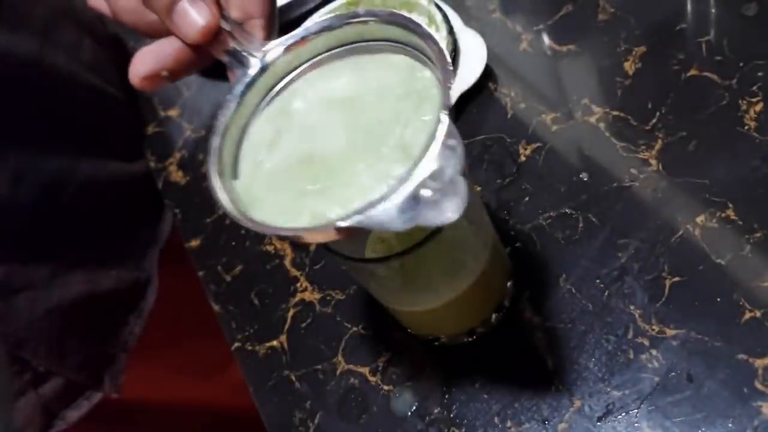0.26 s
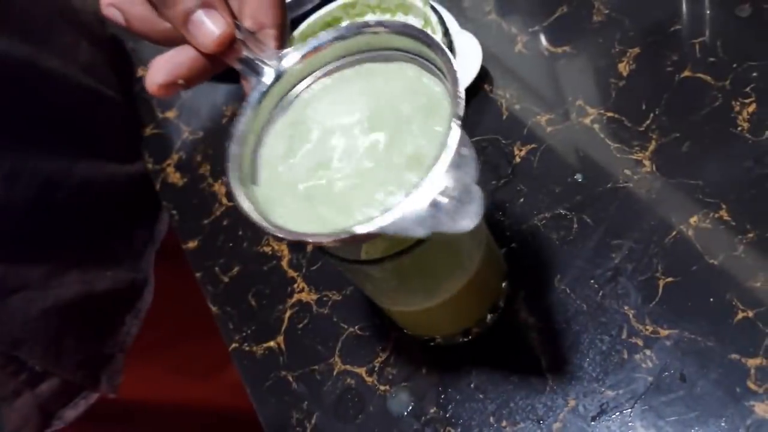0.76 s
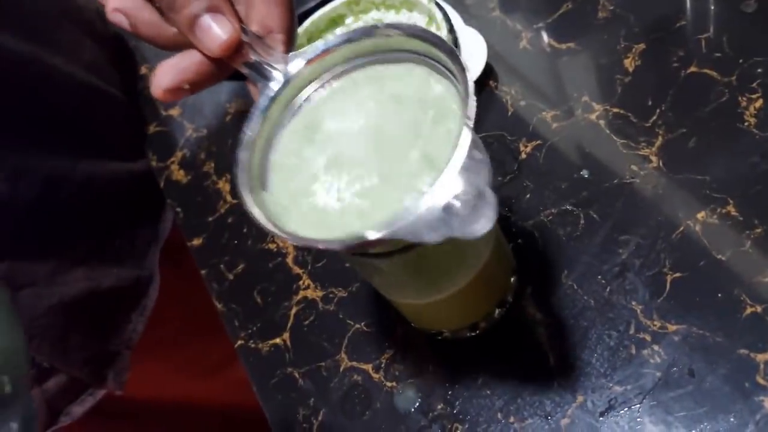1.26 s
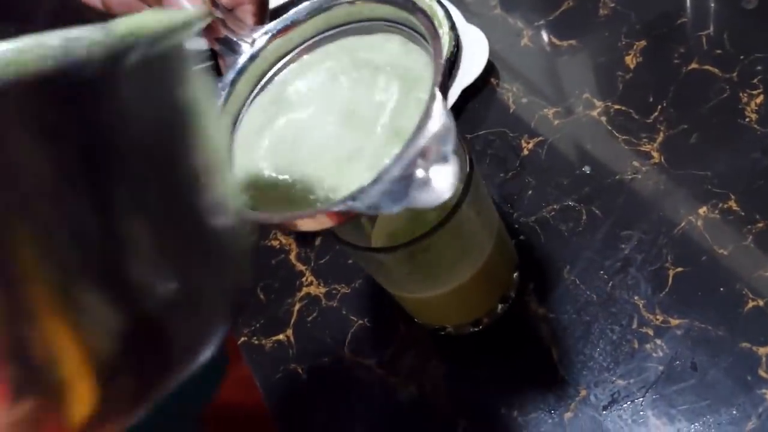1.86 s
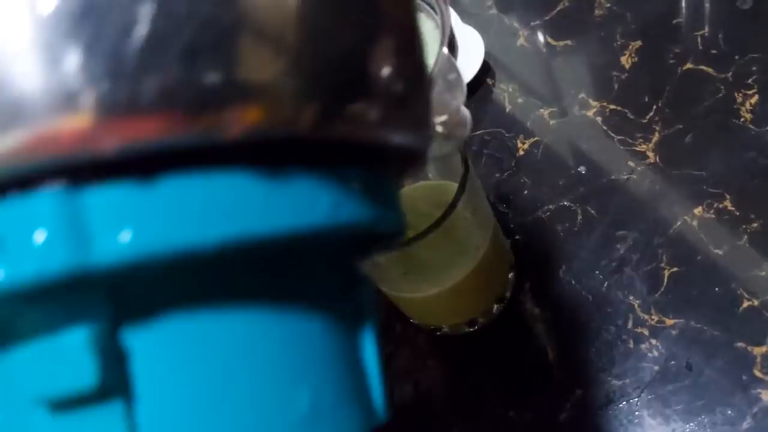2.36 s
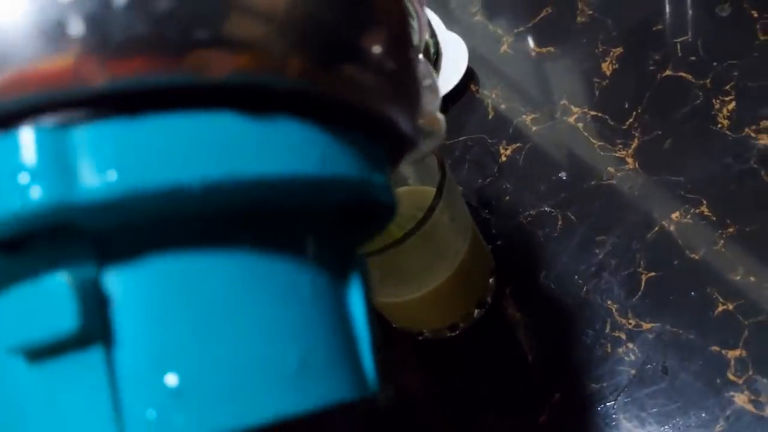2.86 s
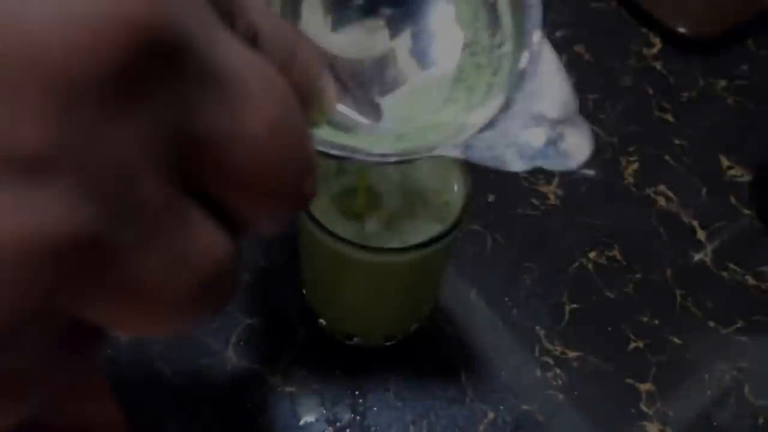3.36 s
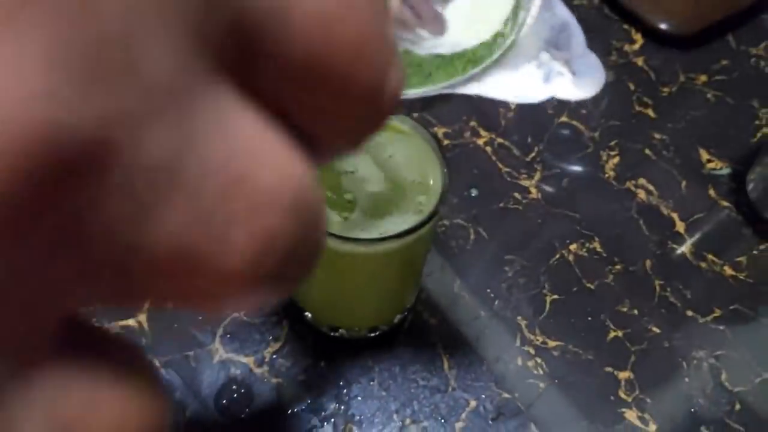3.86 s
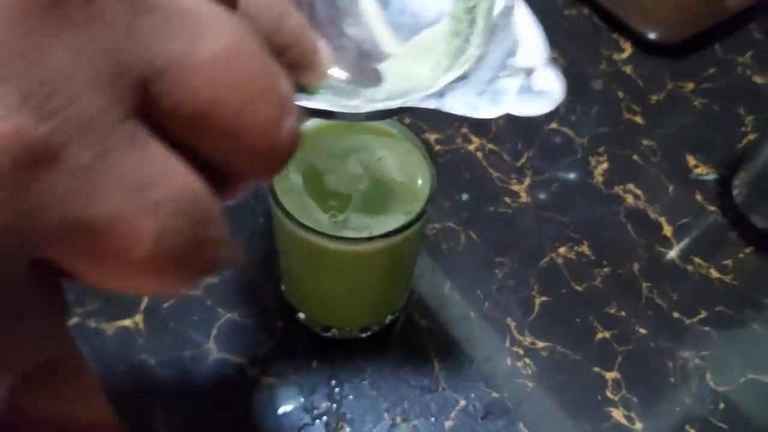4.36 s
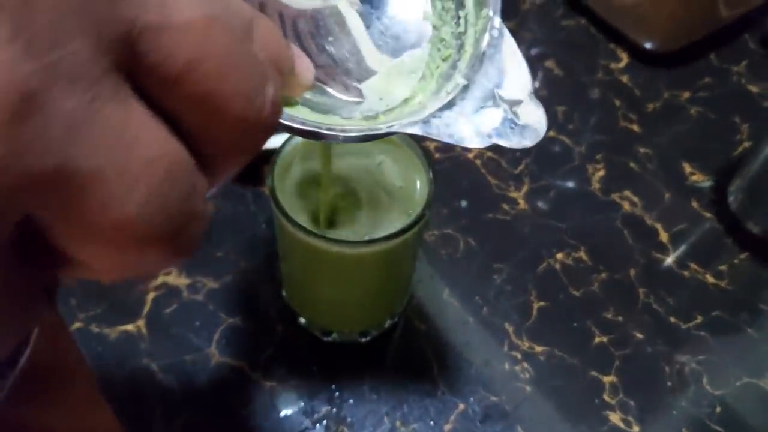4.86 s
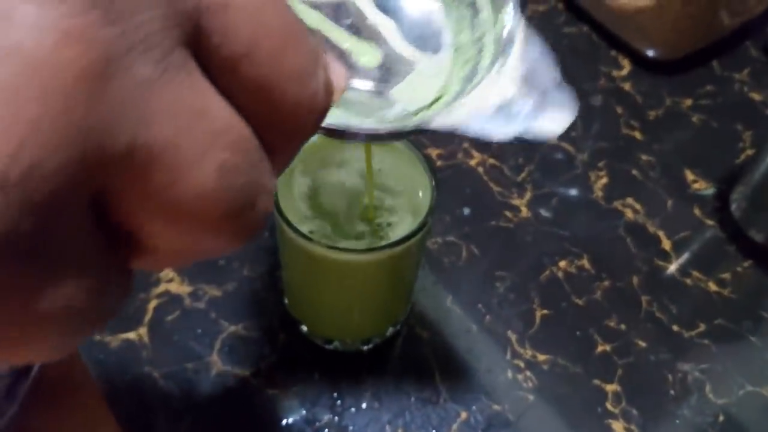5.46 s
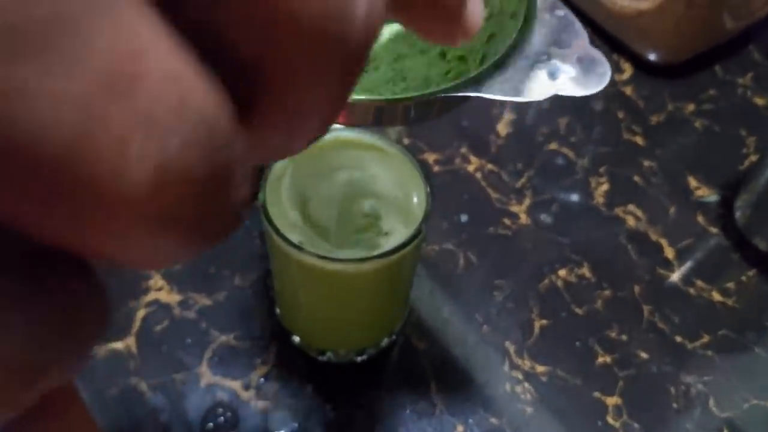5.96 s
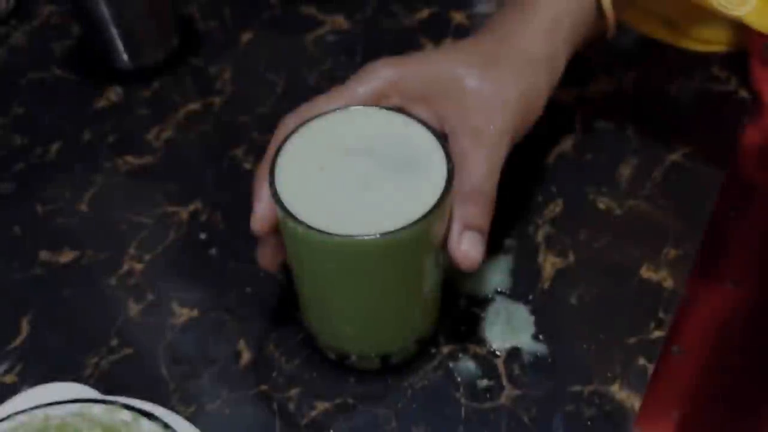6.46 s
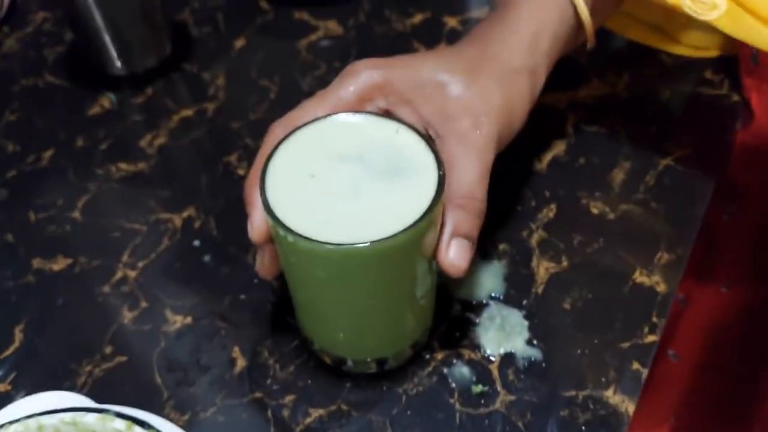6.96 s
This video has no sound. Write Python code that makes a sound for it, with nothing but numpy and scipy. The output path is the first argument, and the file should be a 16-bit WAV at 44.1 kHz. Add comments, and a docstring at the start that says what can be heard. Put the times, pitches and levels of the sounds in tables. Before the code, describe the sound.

Close in a small kitchen with a low fan hum, a metal strainer ticks and scuffs in the hand, then knocks twice, hard and clanky, on a vessel rim. A few light ticks follow. The sound fades out and returns; wet pulp squelches with one sharp pop, then thick juice plops quickly into a full glass. Another fade leaves only faint fan noise.

```python
"""On a stone kitchen counter thick juice is strained over a glass while a fan hums.
Struck steel rings as decaying modes under clattering noise: two knocks on a vessel's rim, light ticks, scuffs.
Wet pulp squelches as swelling noise and popping air; a thin stream plops into the full glass as bubbles ring.
The fan sums shaft harmonics and filtered noise; a drone, hiss, whine and whistles are wavering tones and noise.
The sound fades out and in again twice between the stages of the work."""
import sys
import numpy as np
from scipy import signal
from scipy.fft import rfft, irfft, next_fast_len
from scipy.io import wavfile
from scipy.ndimage import map_coordinates

SR = 44100
rng = np.random.default_rng(int(sys.argv[2]) if len(sys.argv) > 2 else 0)


def put_to_file(sound):
    """Save the sound as 16-bit audio at rate SR, in the file named by the first command-line argument."""
    columns = np.atleast_2d(sound).T  # one column per channel
    safe = np.clip(columns, -1, 1)
    whole_steps = np.round(safe * 32767)
    wavfile.write(sys.argv[1], SR, whole_steps.astype(np.int16))


N = 317946
TIME = np.arange(N) / SR
AGE = np.arange(SR // 2) / SR  # time since an event [s]

# reverberation of the kitchen: (frequency [Hz], t60 [s])
ROOM_T60 = [(200, .35), (800, .36), (2000, 0.29), (4500, 0.28), (9000, 0.27), (16000, 0.36)]
# silent points between the stages of the work: (time [s], fade-out [s], fade-in [s])
STAGE_BREAKS = [(3.275, 0.53, 0.37), (6.34, 0.53, 0.48)]
OPENING_GAIN, OPENING_S = 0.47, 0.34  # the first fade-in starts at this gain

# spectrum of the hiss: (frequency [Hz], relative level [dB])
HISS_SPECTRUM = [(1000, -5.5), (3000, -8), (4000, -6.5), (4700, -11), (5900, -7.5), (6500, -8),
                 (7300, -0.5), (8600, -9.5), (15800, -9)]
# one rise and fall of the hiss near the end: (peak time [s], level [dB], standard deviation [s])
HISS_RISE = (6.92, -73.5, 0.076)
# resonances of the drone: (frequency [Hz], half-width [Hz], relative level [dB])
DRONE_MODES = [(326.8, 11, -2), (380, 14, -14.5), (441, 29, -8), (520, 27, -10.5)]
# swells of the drone above its rest: (peak time [s], level [dB], standard deviation [s])
DRONE_SWELLS = [(1.0, -63.5, .5), (1.73, -57.5, 0.13), (2.199, -65, 0.36), (4.12, -63, 0.42),
                (5.249, -65, 0.19)]
DRONE_REST_DB = -77.5

# lines of the fan motor: (multiple of the shaft rate, mean level before the stage gain [dB])
MOTOR_LINES = [(1, -76), (4, -62.5), (5, -70.5), (6, -69.5)]
# spectrum of the fan's air: (frequency [Hz], relative level [dB])
AIR_SPECTRUM = [(16, -55), (28, -27.5), (45, -3.5), (75, -1.5), (120, -1.5), (210, -8), (300, -9),
                (380, -16.5), (520, -18), (700, -21), (1000, -30.5), (1500, -28.5), (3200, -42.5),
                (9000, -61)]
# gains of the fan, one row a stage: (hum [dB], air [dB], rumble [dB])
FAN_STAGE_GAINS = [(0.74, -1.7, 1), (-0.5, 0.8, 0.5), (-4.5, -2, -6.5)]
SHAFT_HZ, RUMBLE_HZ = 45.05, 130  # rumble is the air noise below RUMBLE_HZ

# faint gliding tones: (start [s], length [s], start pitch [Hz], end pitch [Hz], width [Hz], level [dB])
WHISTLE_GLIDES = [(3.3, 0.39, 1264, 1180, 110, -67.5), (5.417, 0.12, 1620, 1570, 90, -76),
                  (5.589, 0.23, 1850, 1694, 200, -77), (6.591, .1, 1750, 2250, 260, -71.5),
                  (6.65, .14, 2590, 2370, 379, -78)]
WHISTLE_ATTACK_S, WHISTLE_RELEASE_SHARE = 0.049, 0.31  # release time constant as a share of the length

# shifts of the strainer in the hand: (start [s], end [s], mean level [dB])
HAND_SHIFTS = [(0.211, 0.319, -62), (0.464, 0.697, -71), (1.484, 1.68, -78), (1.799, 2.05, -75)]
# spectrum of the slips: (frequency [Hz], relative level [dB])
SCUFF_SPECTRUM = [(500, -10.5), (1100, -10), (1550, 6), (2000, -8), (2500, -1), (3200, -12), (4000, -4),
                  (5200, -17), (7400, -14), (15000, -25.5)]
SCUFFS_PER_S, SCUFF_DECAY_S = 45, 0.008

# light touches of the strainer:
# (time [s], level [dB], pitch [Hz], width [Hz], bright snap level [dB], low ring level [dB])
LIGHT_TOUCHES = [(0.2002, -46.5, 8500, 1000, -41, -61.5), (0.234, -56, 2480, 900, -68, -61),
                 (0.287, -61, 3100, 1400, -59, -57.5), (0.307, -45.5, 1494, 129, -69, -56.5),
                 (0.484, -57.5, 7300, 700, -69, -74), (0.6352, -58, 3950, 498, -59, -64.5),
                 (0.643, -58, 7300, 300, -55, -78), (0.7202, -43.5, 1580, 140, -49.5, -50.5),
                 (1.3, -55, 3870, 299, -79, -82), (1.7531, -48, 1515, 110, -55, -70),
                 (1.9291, -59, 7690, 500, -54.5, -73), (2.3554, -57.5, 3650, 1600, -62, -71),
                 (2.486, -42.5, 1462, 330, -56, -76), (3.4185, -53, 4410, 3510, -53, -80.5)]
# spectrum of the bright snap: (frequency [Hz], relative level [dB])
SNAP_SPECTRUM = [(500, -24), (2000, -12), (5500, -16), (7500, 1.5), (9500, -3.5), (13000, -1), (16000, -6)]
TICK_DECAY_S = 0.004

# air squeezed through wet pulp: (time [s], pop level before a 3 dB lift [dB], pop pitch [Hz],
# fizz level [dB], fizz build-up time constant [s], fizz decay time constant [s])
PULP_SQUEEZES = [(3.636, -50, 2010, -61, 0.019, 0.031), (4.0561, -32.5, 2410, -34.5, 0.0012, 0.0067),
                 (4.2600, -49, 3116, -31, 0.011, 0.006), (4.2655, -15, 2584, -24, 0.00047, 0.0022),
                 (4.2699, -24.5, 2900, -33, 0.0013, 0.0084), (4.3238, -43, 2440, -36.5, 0.00058, 0.0044),
                 (4.402, -73, 2630, -50.5, 0.0077, 0.017), (4.536, -68.5, 3010, -60.5, .002, 0.015),
                 (5.690, -53, 3340, -55.5, 0.0067, 0.04)]
# spectrum of the fizz: (frequency [Hz], relative level [dB])
FIZZ_SPECTRUM = [(300, -17), (900, -2.5), (1300, -7.5), (2500, 2), (3400, 0), (4000, 1.5), (4700, -3.5),
                 (6400, -5), (7300, 1.5), (9600, -7.5), (12200, -3.5), (16000, -5)]
FIZZ_SHARPNESS = 0.12  # 0-1, share of the previous sample subtracted

# blobs landing in the glass: (time [s], bubble level [dB], bubble pitch [Hz], splash level [dB])
BLOBS = [(4.9372, -37.5, 1883, -47.5), (4.9683, -48, 2050, -45.5), (4.984, -44, 2110, -53.5),
         (5.001, -43, 2700, -50.5), (5.056, -51, 905, -44.5), (5.1005, -64, 2900, -47.5),
         (5.1333, -46.5, 867, -48), (5.161, -77, 1000, -57.5), (5.2176, -42.5, 903, -46.5),
         (5.240, -52, 890, -55), (5.250, -54, 400, -64), (5.2770, -58, 1890, -45.5),
         (5.3194, -51, 900, -46)]
# spectrum of the splash: (frequency [Hz], relative level [dB])
SPLASH_SPECTRUM = [(410, -58), (700, -17), (898, -12), (1020, -6.5), (1770, -12), (2020, -1), (2330, -30),
                   (2660, -9.5), (5260, -15), (8100, -12), (12500, -20.5), (16000, -23)]
BUBBLE_CYCLES, SPLASH_DECAY_S = 10.4, 0.0062  # a main bubble falls to 1/e in so many cycles

# steel meeting the rim, a graze and then the blow:
# (time [s], clatter level [dB], decay time constant [s], contact brightness as a low-pass corner [Hz])
RIM_CONTACTS = [(0.8628, -52, .006, 14000), (0.8691, -25.5, .012, 1700), (0.8846, -24.5, .003, 3500),
                (0.888, -10, .003, 8000), (0.8922, -15.5, .012, 2050), (0.9075, -21, .006, 1110),
                (1.0614, -49.5, .006, 12000), (1.0695, -26.5, .011, 2600), (1.0796, -16, .005, 2960),
                (1.0834, -9.5, .003, 8000), (1.0870, -15.5, .008, 3500)]
# the two full blows: (time [s])
FULL_BLOWS = [0.8882, 1.0815]
# modes of strainer and vessel ringing together, struck at two spots:
# (frequency [Hz], first blow before a 1 dB cut [dB], second blow before the same cut [dB], t60 [s])
STEEL_MODES = [(309, -44, -44, .3), (566, -25.5, -32, .16), (628, -29, -36, .14), (754, -32, -36, .17),
               (782, -30, -33, .13), (831, -32, -32, 0.17), (934, -24, -34, .16), (992, -22.5, -27, 0.16),
               (1319, -37.5, -46, .18), (1631, -43, -36, .14), (1796, -27, -32, .14),
               (1897, -31, -34, 0.17), (2011, -26, -29, .13), (2064, -23, -22, 0.15), (2260, -31, -32, .13),
               (2289, -26, -34, .15), (2401, -46, -36, .16), (2514, -33, -43, .15), (2634, -29, -27, .1),
               (2772, -37, -44, .17), (2859, -40, -37, .18), (3033, -34, -33, .11), (3230, -38, -35, .12),
               (3390, -38, -30, .14), (3698, -45, -39, .17), (4260, -45.5, -45, .15)]
# spectrum of the clatter: (frequency [Hz], relative level [dB])
CLATTER_SPECTRUM = [(25, -45.5), (100, -17.5), (400, -20), (570, -5.5), (980, -6.5), (1200, -21),
                    (1550, -12.5), (2050, 3), (2430, -7.5), (2680, -2.5), (3150, -4), (4000, -16),
                    (4750, -10), (6000, -22.5), (7400, -21.5), (16000, -48.5)]
# place of the knocks between the microphones: (frequency [Hz], left minus right [dB])
KNOCK_LEAN = [(60, -6.5), (110, -7.5), (200, -5.5), (380, -2.5), (700, -2.0), (1290, -6.5), (2380, -1.5),
              (4400, -4.0), (8120, -4.5), (15000, -3.0)]


def undb(db):
    """Convert a level in decibels to an amplitude ratio."""
    return 10 ** (np.asarray(db) / 20)


def unit(x):
    """Normalise a signal to an rms of one."""
    return x / np.sqrt(np.mean(x ** 2))


def add(track, s, sound):
    """Superpose a sound on a track from s seconds on."""
    start = max(int(s * SR), 0)
    part = sound[..., :N - start]
    track[..., start:start + part.shape[-1]] += part


def on_log_axis(hz, points):
    """Interpolate (frequency, value) points on a logarithmic frequency axis."""
    f, value = np.transpose(points)
    return np.interp(np.log(np.maximum(hz, 1)), np.log(f), value)


def colour(x, points, size=4096):
    """Minimum-phase filtering to a given spectrum; white noise keeps its level."""
    hz = np.arange(size // 2 + 1) * SR / size
    cepstrum = irfft(np.log(undb(on_log_axis(hz, points))))
    # folding the cepstrum makes the response causal
    cepstrum[1:size // 2] *= 2
    cepstrum[size // 2 + 1:] = 0
    response = irfft(np.exp(rfft(cepstrum)))
    response /= np.linalg.norm(response)
    return signal.fftconvolve(x, response[None])[:, :x.shape[1]]


def resonate(x, hz, width):
    """A second-order resonance selects a band; white noise keeps its level."""
    b, a = signal.iirpeak(min(hz, SR / 2 - 2000), hz / width, SR)
    return signal.lfilter(b, a, x) * np.sqrt(SR / (np.pi * width))


def noise(count, alike):
    """A shared component sets the correlation of left and right noise."""
    shared, *separate = rng.standard_normal((3, count))
    return np.sqrt(alike) * shared + np.sqrt(1 - alike) * np.array(separate)


def burst(decay, alike):
    """A rush of tiny contacts is noise under an exponential decay."""
    return noise(len(AGE), alike) * np.exp(-AGE / decay)


def walk(rate):
    """Smoothly interpolated random values, rate knots a second, fluctuate with an rms of one."""
    knots = rng.standard_normal(512)
    return unit(map_coordinates(knots, [TIME * rate], order=2, mode="mirror"))


def swell(s, db, spread):
    """A Gaussian envelope raises and lowers the gain around s seconds."""
    return undb(db) * np.exp(-.5 * ((TIME - s) / spread) ** 2)


def wavering(hz, width, count=N):
    """Slow random modulation of amplitude and phase spreads a tone over width Hz."""
    slow = signal.butter(2, width / 2, fs=SR, output="sos")
    flutter = signal.sosfilt(slow, noise(count, alike=0.24) + 1j * noise(count, alike=0.65))
    carrier = np.exp(2j * np.pi * np.cumsum(hz * np.ones(count)) / SR)
    return unit((flutter * carrier).real)


def pan(x, left_db, count=0):
    """Level difference places a sound; it reaches the right microphone count samples late."""
    ears = np.array([x[0], np.roll(x[1], count)])
    return ears * undb(np.array([[left_db], [-left_db]]) / 2)


def balance(x, points):
    """A level difference that varies with frequency places each band separately."""
    size = next_fast_len(N, True)
    left_db = on_log_axis(np.arange(size // 2 + 1) * SR / size, points)
    return irfft(rfft(x, size) * undb(np.array([left_db, -left_db]) / 2), size)[:, :N]


def kitchen(x, wet_db):
    """Dense reflections from counter and walls decay at a rate set by frequency."""
    hz, t, bands = signal.stft(rng.standard_normal((2, len(AGE))), SR, nperseg=256)
    decay = np.exp(-np.log(1000) * t / on_log_axis(hz, ROOM_T60)[:, None])
    tail = signal.istft(bands * decay)[1][:, :len(AGE)]
    tail *= 1 - np.exp(-AGE / 0.004)
    tail /= np.linalg.norm(tail, axis=1, keepdims=True)
    return x + undb(wet_db) * signal.fftconvolve(x, tail, axes=1)[:, :N]


def hiss():
    """Broadband noise of shaped spectrum adds in power to one Gaussian swell."""
    gain = np.hypot(undb(-75.0), swell(*HISS_RISE))
    return pan(gain * colour(noise(N, alike=0.16), HISS_SPECTRUM), left_db=-2.0)


def whine():
    """Random modulation broadens a faint high tone."""
    return pan(undb(-90.5) * wavering(hz=6150, width=90), left_db=-2.0)


def drone():
    """Low narrow-band tones sum, and their power swells out of a resting level."""
    power = undb(DRONE_REST_DB) ** 2 + sum(swell(*row) ** 2 for row in DRONE_SWELLS)
    tones = unit(sum(undb(db) * wavering(hz, 2 * half_width) for hz, half_width, db in DRONE_MODES))
    return pan(tones * np.sqrt(power), left_db=-4.0)


def fan():
    """Slightly wavering shaft harmonics add to the rush and rumble of air, with fixed gains in each stage."""
    turn = 2 * np.pi * np.cumsum(SHAFT_HZ * (1 + 0.0006 * walk(4))) / SR
    hum = np.zeros(N)
    for multiple, db in MOTOR_LINES:
        line = np.sin(multiple * turn + 2 * np.pi * rng.random())
        hum += np.sqrt(2) * undb(db + 1.1 * walk(9)) * line
    air = undb(-64.0 + 0.67 * walk(2.0)) * colour(noise(N, alike=0.49), AIR_SPECTRUM)
    rumble = signal.sosfiltfilt(signal.butter(2, RUMBLE_HZ, fs=SR, output="sos"), air)
    rush = air - rumble
    # the gains step at the silent points
    stage = np.searchsorted([s for s, _, _ in STAGE_BREAKS], TIME)
    hum_gain, rush_gain, rumble_gain = undb(FAN_STAGE_GAINS)[stage].T
    flow = rush * rush_gain + rumble * rumble_gain
    return pan([hum, hum], left_db=-7.5) * hum_gain + pan(flow, left_db=-6.5)


def whistles():
    """Narrow-band tones glide in pitch, each with a weaker inharmonic partner above it."""
    out = np.zeros((2, N))
    age = np.arange(SR) / SR
    for s, length, start_hz, end_hz, width, db in WHISTLE_GLIDES:
        pitch = np.interp(age, [0, length], [start_hz, end_hz])
        partner = wavering(1.52 * pitch, 2 * width, count=SR)
        tone = wavering(pitch, width, count=SR) + undb(-10.5) * partner
        attack = np.minimum(age / WHISTLE_ATTACK_S, 1)
        since_release = np.maximum(age + WHISTLE_ATTACK_S - length, 0)
        release = np.exp(-since_release / (WHISTLE_RELEASE_SHARE * length))
        add(out, s, undb(db) * attack * release * tone)
    return pan(out, left_db=-6.5)


def scuffs():
    """Tiny slips of the strainer at uneven intervals each release a decaying burst of noise."""
    slips = np.zeros((2, N))
    for start, end, db in HAND_SHIFTS:
        for s in np.arange(start, end, 1 / SCUFFS_PER_S):
            slip_s = s + rng.random() / SCUFFS_PER_S
            slip_gain = undb(db + 2.65 * rng.standard_normal())
            add(slips, slip_s, slip_gain * burst(SCUFF_DECAY_S, alike=0.5))
    return pan(kitchen(colour(slips, SCUFF_SPECTRUM), wet_db=-5.5), left_db=-4.0)


def ticks():
    """The hand damps light touches to a short resonance, a bright snap and a low mode of the steel."""
    body, snap = np.zeros((2, N)), np.zeros((2, N))
    low_mode = np.sin(2 * np.pi * 565 * AGE) * np.exp(-AGE / 0.037)
    for s, db, hz, width, snap_db, low_db in LIGHT_TOUCHES:
        narrow = resonate(burst(TICK_DECAY_S, alike=0.46), hz, width)
        touch = resonate(narrow, 1.1 * hz, 0.45 * hz)
        # every touch gets the mean energy of an unfiltered burst
        energy = np.mean(np.sum(touch ** 2, axis=1))
        touch *= np.sqrt(TICK_DECAY_S * SR / 2 / energy)
        add(body, s, undb(db) * touch + undb(low_db) * low_mode)
        add(snap, s, undb(snap_db) * burst(0.0025, alike=0.16))
    return pan(kitchen(body + colour(snap, SNAP_SPECTRUM), wet_db=-5.5), left_db=-4.0)


def bubble(hz, decay, rise):
    """An air pocket rings as a damped oscillator and climbs in pitch as it opens."""
    pitch = hz * (1 + rise * (1 - np.exp(-AGE / (2 * decay))))
    envelope = np.exp(-AGE / decay) * (1 - np.exp(-AGE / 0.00051))
    return np.sin(2 * np.pi * np.cumsum(pitch) / SR) * envelope


def squelches():
    """Foam noise grows exponentially until a pocket of air pops, then decays."""
    pops, fizz = np.zeros((2, N)), np.zeros((2, N))
    lead = AGE[-1] / 2  # the fizz peaks in mid-buffer, together with the pop
    for s, pop_db, hz, fizz_db, build, decay in PULP_SQUEEZES:
        add(pops, s, undb(pop_db + 3.0) * bubble(hz, decay=0.0013, rise=0.015))
        envelope = np.exp(-np.maximum((lead - AGE) / build, (AGE - lead) / decay))
        # random gains make the noise grainy
        grains = unit(undb(3.34 * rng.exponential(size=len(AGE)))) * noise(len(AGE), alike=0.034)
        # fine foam bursts with less bass and more treble
        foam = signal.lfilter([1, -FIZZ_SHARPNESS], 1, grains)
        add(fizz, s - lead, undb(fizz_db) * envelope * foam)
    popping = kitchen(pan(pops, left_db=-6.0, count=3), wet_db=-12)
    fizzing = kitchen(pan(colour(fizz, FIZZ_SPECTRUM), left_db=-1.5), wet_db=-9.0)
    return popping + fizzing


def drops():
    """Each blob slaps the surface and traps a ringing bubble, which the thick juice damps quickly."""
    plops, splash = np.zeros((2, N)), np.zeros((2, N))
    for s, db, hz, splash_db in BLOBS:
        add(plops, s, undb(db) * bubble(hz, BUBBLE_CYCLES / hz, rise=0.065))
        # eight more bubbles follow in the splash, the later the weaker
        for delay, pitch in rng.random((8, 2)):
            follower = bubble(1100 + 2100 * pitch, decay=0.005, rise=0.083)
            add(plops, s + 0.031 * delay ** 2, undb(splash_db - 5 - 9.8 * delay) * follower)
        # the spray level jumps every 32 samples
        steps = np.repeat(rng.standard_normal(len(AGE)), 32)[:len(AGE)]
        spray = unit(undb(3 * steps))
        add(splash, s, undb(splash_db) * spray * burst(SPLASH_DECAY_S, alike=0.22))
    return pan(kitchen(plops + colour(splash, SPLASH_SPECTRUM), wet_db=-5.5), left_db=-2.5, count=4)


def knocks():
    """Each contact clatters as decaying noise; the two full blows excite the modes of the steel."""
    hz, *strike_db, t60 = np.transpose(STEEL_MODES)
    ring, clatter = np.zeros((2, N)), np.zeros((2, N))
    for s, db in zip(FULL_BLOWS, strike_db):
        phase, lean = rng.random(len(hz)), rng.standard_normal(len(hz))
        turns = hz[:, None] * AGE + phase[:, None]
        modes = np.exp(2j * np.pi * turns - np.log(1000) * AGE / t60[:, None])
        # every mode reaches the two microphones with a phase of its own
        ears = 1 + 0.5j * lean * np.array([[1], [-1]])
        add(ring, s, ((ears * undb(db)) @ modes).imag * (1 - np.exp(-AGE / 0.0018)))
    for s, db, decay, bright_hz in RIM_CONTACTS:
        pole = np.exp(-2 * np.pi * bright_hz / SR)
        contact = signal.lfilter([1 - pole], [1, -pole], burst(decay, alike=0.19))
        add(clatter, s, undb(db) * contact)
    ringing = kitchen(undb(-1.0) * ring, wet_db=-19)
    clattering = kitchen(colour(clatter, CLATTER_SPECTRUM), wet_db=-13.0)
    return balance(ringing + clattering, KNOCK_LEAN)


def fades():
    """Linear ramps of gain rise at the opening, and fall to silence and rise again at each break."""
    gain = np.interp(TIME, [0, OPENING_S], [OPENING_GAIN, 1])
    for s, fade_out, fade_in in STAGE_BREAKS:
        gain = gain * np.interp(TIME, [s - fade_out, s, s + fade_in], [1, 0, 1])
    return gain


def scene():
    """Superposition of the steady sounds and the work at the counter, under the fades."""
    steady = hiss() + whine() + drone() + fan()
    work = scuffs() + ticks() + squelches() + drops() + knocks()
    return (steady + whistles() + work) * fades()


def record(dry):
    """A steep elliptic low-pass filter removes the treble above 15950 Hz."""
    return signal.sosfilt(signal.ellip(10, 0.2, 70, 15950, fs=SR, output="sos"), dry)


dry = scene()
out = record(dry)
put_to_file(out)
```